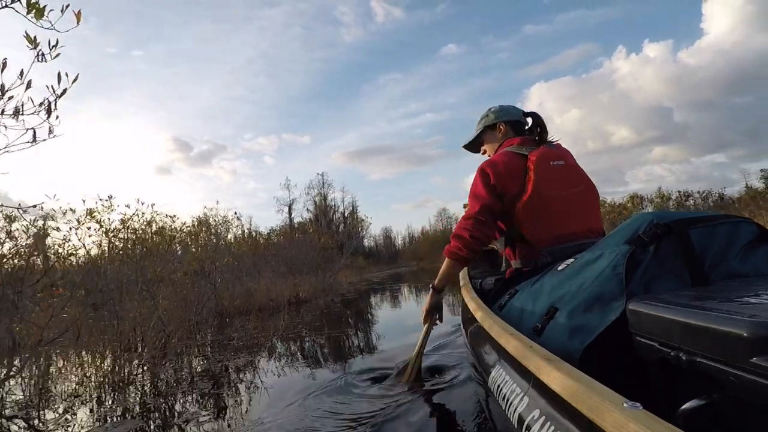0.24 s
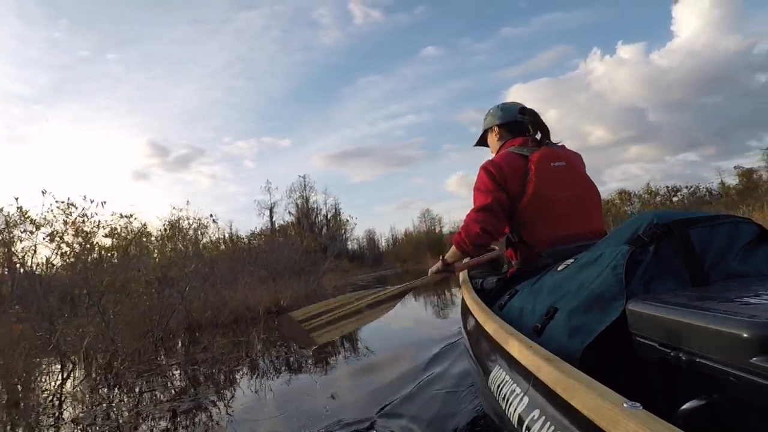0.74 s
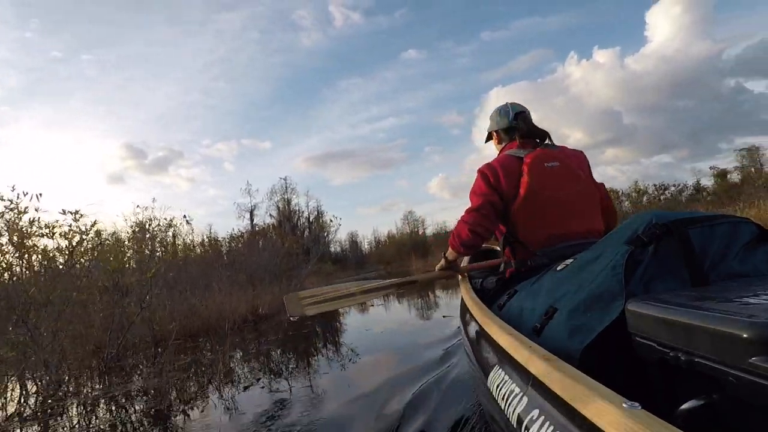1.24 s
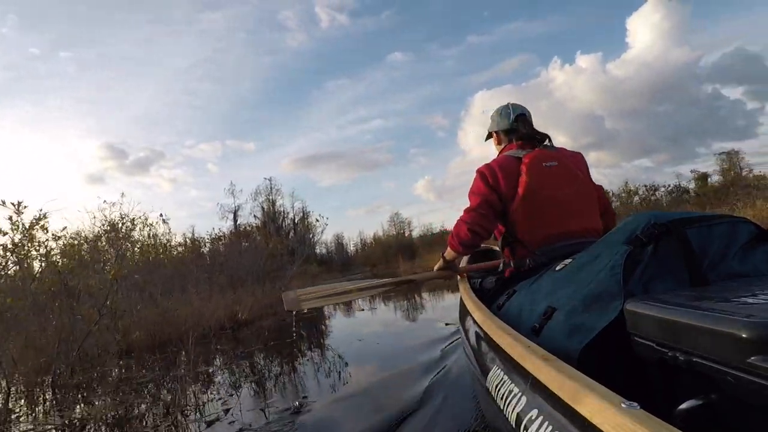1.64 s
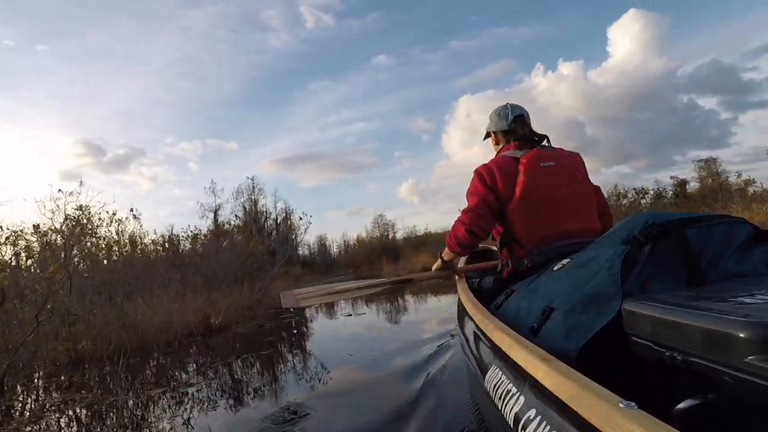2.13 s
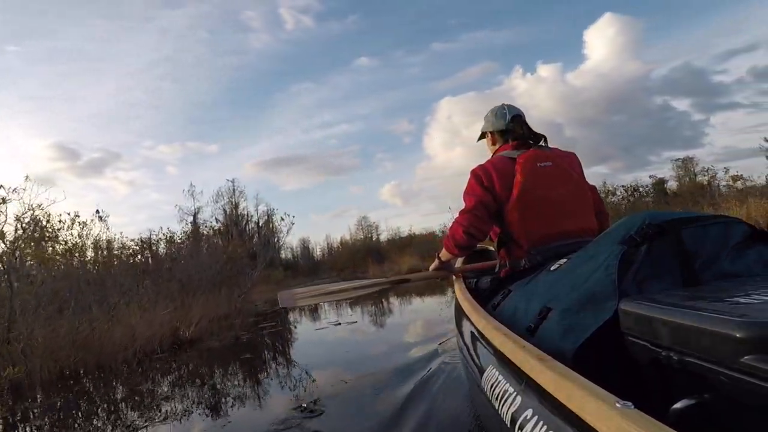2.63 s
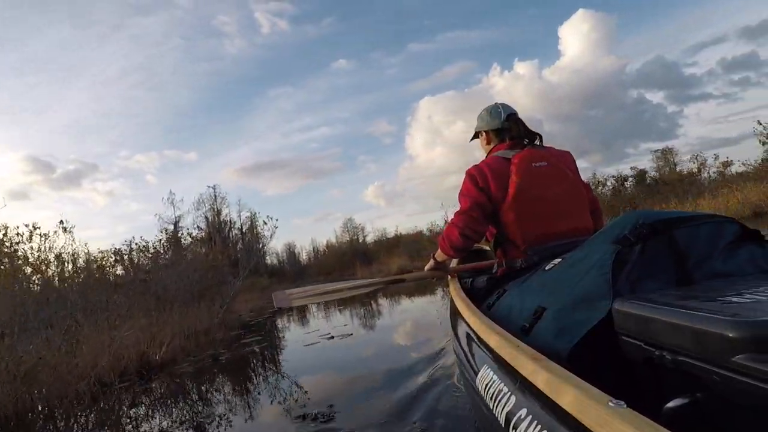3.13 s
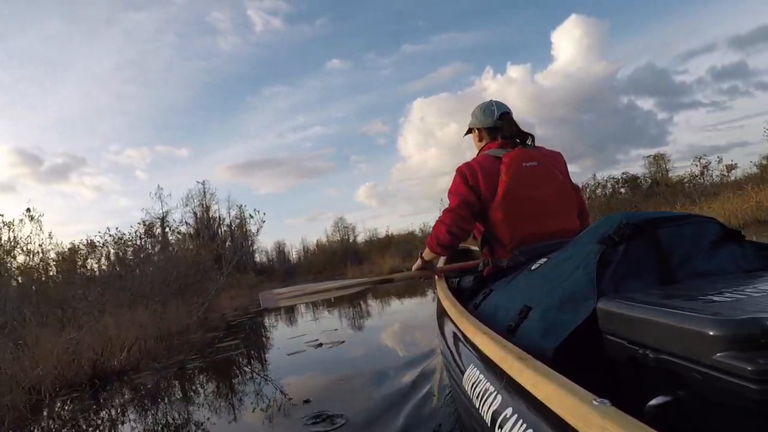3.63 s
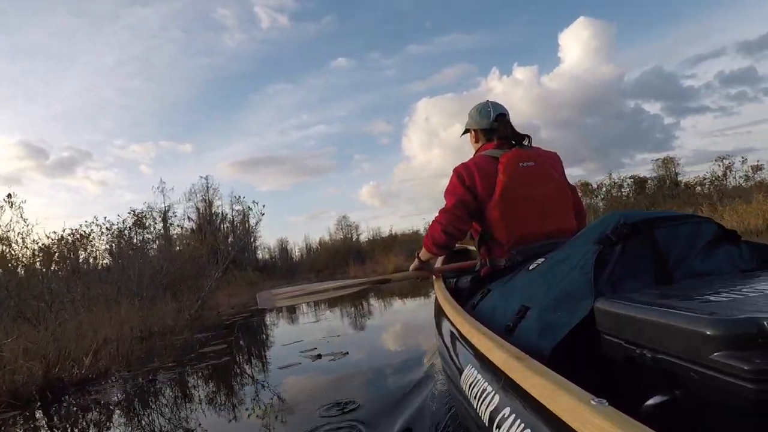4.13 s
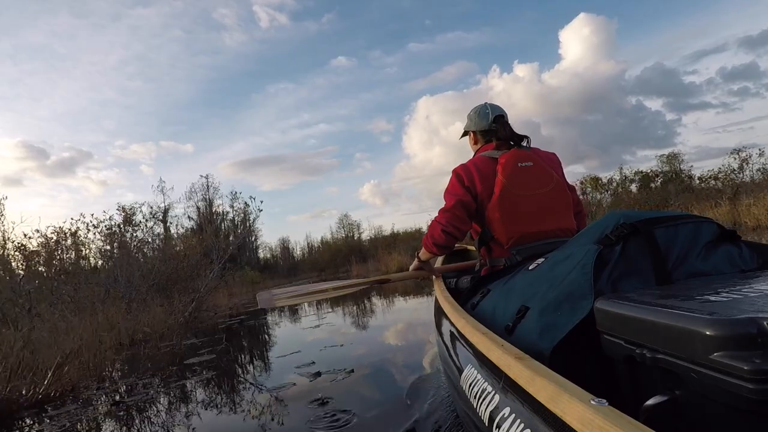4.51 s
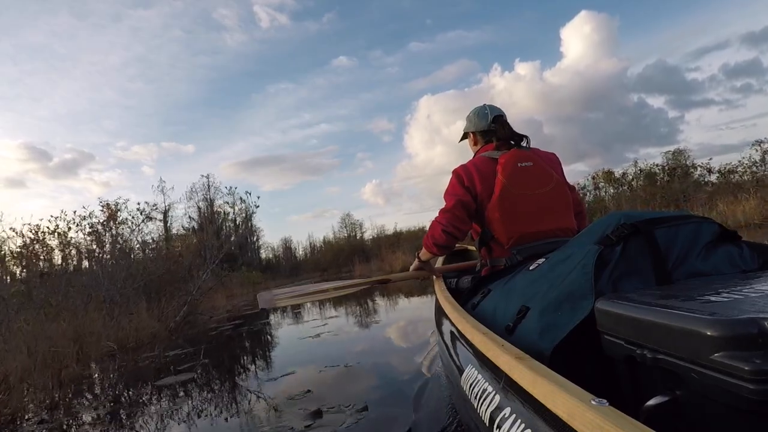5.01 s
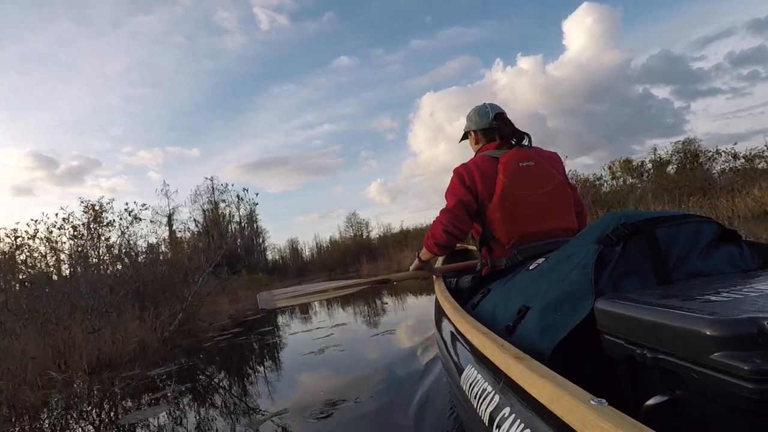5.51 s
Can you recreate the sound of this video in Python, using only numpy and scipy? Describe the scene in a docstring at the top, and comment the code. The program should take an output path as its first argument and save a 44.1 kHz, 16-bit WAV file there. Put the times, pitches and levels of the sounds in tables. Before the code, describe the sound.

A canoe paddle splashes and drips, then knocks against the hull, while low wind buffets the microphone.

```python
"""Wind buffets each microphone and water runs off a lifted paddle as a canoe glides over a still marsh.
Drops and splashes tick, and the air bubbles they trap ring. The shaft knocks and rubs on the gunwale;
hull and mount resonate and carry this to the two microphones, largely in opposite phase. The hull also
rocks, thumps and hums in its low modes. Spray hisses off the blade and later reeds brush past;
insects and reeds hiss far off, and a limiter holds the loudest knocks."""
import sys
import numpy as np
from scipy import signal
from scipy.fft import rfft, irfft
from scipy.io import wavfile
from scipy.ndimage import uniform_filter1d

SR = 44100
rng = np.random.default_rng(int(sys.argv[2]) if len(sys.argv) > 2 else 0)


def transcribe(u):
    """Save the signal u as a 16-bit wav file named by the first command-line argument.

    u: samples, shape (n,) or (channels, n), limited to [-1, 1]; the rate is SR.
    q: integer samples, one column per channel.
    """
    v = np.clip(np.atleast_2d(u).T, -1, 1)
    q = np.round(v * 32767).astype(np.int16)
    wavfile.write(sys.argv[1], SR, q)


N = 254016

# Water running off the blade or lapping at the hull: start_s, hold_s, level_db, tilt_db_per_octave
FLOWS = [(0, 0.013, -46.5, -0.5), (0.212, 0.2, -46, 2.3), (0.635, 0.53, -48, -1.7),
         (3.27, 0.78, -52.5, -3.5), (5.184, 0.17, -51, 2.9), (5.648, 0.028, -44, -2)]
FLOW_RISE_DB_PER_S, FLOW_FALL_DB_PER_S = 171, 114
OPPOSITE = np.array([[1], [-1]])   # sign of the left and right channel


def from_db(db):
    """Amplitude ratio of a level in decibels."""
    return 10 ** (np.asarray(db) / 20)


def rms_one(x):
    """Normalisation to unit rms."""
    return x / np.sqrt(np.mean(x ** 2) + 1e-20)


def at_hz(points, hz):
    """Interpolation on a logarithmic frequency axis."""
    points_hz, values = np.transpose(points)
    return np.interp(np.log(hz), np.log(points_hz), values)


def add(track, start_s, piece):
    """Superposition of a piece on a track."""
    i = int(start_s * SR)
    track[max(i, 0):i + len(piece)] += piece[max(-i, 0):N - i]


def band(x, low_hz, high_hz):
    """Butterworth band-pass."""
    sos = signal.butter(2, [low_hz, min(high_hz, .45 * SR)], "band", fs=SR, output="sos")
    return signal.sosfilt(sos, x)


def low_pass(x, hz, order=4):
    """Butterworth low-pass."""
    return signal.sosfilt(signal.butter(order, hz, fs=SR, output="sos"), x)


def resonate(x, hz, width_hz):
    """A damped resonator, scaled to preserve the rms of white noise."""
    r = np.exp(-np.pi * width_hz / SR)
    gain = np.sqrt((1 - r * r) / 2)
    return signal.lfilter([gain, 0, -gain], [1, -2 * r * np.cos(2 * np.pi * hz / SR), r * r], x)


def drift(corner_hz):
    """Slow random fluctuation: low-passed Gaussian noise of unit rms."""
    step, settle = 40, 2000   # audio samples per point; points discarded
    r = np.exp(-2 * np.pi * corner_hz * step / SR)
    slow = signal.lfilter([1], [1, -2 * r, r * r], rng.standard_normal(N // step + settle + 2))[settle:]
    return np.interp(np.arange(N) / step, np.arange(len(slow)), rms_one(slow))


def grains(per_s, spread_db):
    """A Poisson train of clicks of uneven size, at unit rms."""
    sizes = from_db(spread_db * np.minimum(rng.exponential(1, N), 4)) * rng.choice([-1, 1], N)
    return rms_one(sizes * (rng.random(N) < per_s / SR)) + 1e-18


def pulse(hz, cycles):
    """A pressure pulse: a cosine under a Gaussian envelope, centred 0.05 s in."""
    t = np.arange(-SR // 20, SR // 20) / SR
    return np.cos(2 * np.pi * hz * t) * np.exp(-(t * hz / cycles) ** 2)


def spells(rows, rise_db_per_s, fall_db_per_s, rest_db):
    """Level in dB of spells that rise, hold and decay; their powers add to a resting level."""
    t = np.arange(N) / SR
    power = from_db(2 * rest_db)
    for start_s, hold_s, db, *_ in rows:
        before_db = rise_db_per_s * np.maximum(start_s - t, 0)
        after_db = fall_db_per_s * np.maximum(t - start_s - hold_s, 0)
        power = power + from_db(2 * (db - before_db - after_db))
    return 10 * np.log10(power)


def wind():
    """Turbulent pressure rumbles and eddies pop, independently at each microphone."""
    # Gust strength: time_s, level_db, left_over_right_db
    gusts = [(0, -18, -7.5), (.16, -22, 10.5), (.48, -22.5, -15), (.64, -32.5, 0), (.9, -23, -4.5),
             (1.25, -35.5, -11), (1.44, -24, -17), (1.85, -22.5, 4.5), (1.97, -29, -2), (2.06, -15, 4.5),
             (2.35, -35, -24), (2.55, -31.5, -7), (3.3, -22.5, -6), (3.6, -29.5, 0), (4.1, -29.5, -9.5),
             (4.22, -34, -1.5), (4.42, -34, -6), (4.52, -23.5, 3), (4.75, -28, -0.5), (5.0, -23.5, -9),
             (5.44, -26, -9.5), (5.76, -23, -10)]
    # Spectrum of the turbulence: frequency_hz, density_db
    gust_spectrum = [(20, 0), (50, 3), (90, -2), (150, -17), (300, -24), (600, -59), (1200, -100)]
    # Strong eddies striking one microphone: time_s, peak_db, pulse_hz, microphone (0 left, 1 right)
    eddies = [(0.127, -5, 171, 1), (1.493, -6, 141, 1), (1.629, -16, 136, 1), (2.076, -9.5, 78.4, 1),
              (2.194, -9.5, 105, 1), (2.378, -11, 120, 1), (4.078, -16.5, 120, 1), (4.521, -12, 138, 0),
              (4.709, -14.5, 137, 0), (4.866, -10.5, 126, 1), (5.068, -6.5, 160, 1), (5.127, -6, 170, 1),
              (5.315, -9.5, 160, 1), (5.38, -8, 171, 1), (5.398, -7, 95, 1), (5.502, -11.5, 156, 1),
              (5.603, -9, 167, 1)]
    times_s, *curves = np.transpose(gusts)
    level_db, lean_db = [np.interp(np.arange(N) / SR, times_s, curve) for curve in curves]
    hz = np.maximum(np.fft.rfftfreq(N, 1 / SR), 1)
    rumble = irfft(rfft(rng.standard_normal((2, N))) * from_db(at_hz(gust_spectrum, hz)), N)
    lumps = from_db(3.5 * np.tanh([drift(9), drift(9)]))
    kicks = lumps * np.abs([grains(70, spread_db=1.5), grains(70, spread_db=2.5)])
    pops = signal.fftconvolve(kicks, [pulse(96.4, cycles=.26)], "same")
    choppy_db = spells([(4.78, .9, -1.6)], rise_db_per_s=28, fall_db_per_s=28, rest_db=-8)
    out = rms_one(rumble * lumps) + from_db(choppy_db) * rms_one(pops)
    out *= from_db(level_db + lean_db / 2 * OPPOSITE)
    for time_s, peak_db, pulse_hz, microphone in eddies:
        add(out[round(microphone)], time_s - .05, from_db(peak_db) * pulse(pulse_hz, cycles=.48))
    return out


def marsh():
    """Distant reeds and insects sum to partly coherent broadband hiss and a narrow-band chorus."""
    # Spectrum of the hiss: frequency_hz, relative_density_db
    hiss_spectrum = [(400, -4), (700, -5.5), (1400, -11.5), (2500, -16), (4500, -16.5), (5200, -23.5),
                     (7000, -14.5), (9000, -19.5), (12000, -25), (14500, -32)]
    # Likeness of the hiss at the two microphones: frequency_hz, correlation
    correlations = [(400, -0.73), (1400, -0.83), (3000, 0.2), (6500, 0.85), (10000, -0.12)]
    hiss_db, insects_db = -57, -66.5
    edges_hz = 350 * 2 ** np.arange(0, 6, .5)
    hiss, white = 0, rng.standard_normal((2, 2, N))
    for k, (low_hz, high_hz) in enumerate(zip(edges_hz, edges_hz[1:])):
        centre_hz = np.sqrt(low_hz * high_hz)
        mid, side = band(white[k % 2], low_hz, high_hz)
        alike = np.clip(at_hz(correlations, centre_hz), -.99, .99)
        gain = from_db(at_hz(hiss_spectrum, centre_hz) + 2 * drift(18))
        hiss = hiss + gain * (mid + np.sqrt((1 - alike) / (1 + alike)) * side * OPPOSITE)
    mid, side = resonate(rng.standard_normal((2, N)), hz=5716, width_hz=150)
    insects = mid + .56 * side * OPPOSITE
    return from_db(hiss_db) * hiss / np.std(hiss.mean(axis=0)) + from_db(insects_db) * insects


def flow_tilt():
    """Spectral slope of the running water through time, in dB per octave."""
    start_s, hold_s, _, tilt = np.transpose(FLOWS)
    return np.interp(np.arange(N) / SR, start_s + hold_s / 2, tilt)


def trickle(level_db):
    """Many small bubbles resonate in running water; neighbours in pitch swell in the same clumps."""
    sizes = 20
    size_of_click = rng.integers(0, sizes, N)
    clicks = grains(4500, spread_db=4.5)
    clumps_db = 9 * np.tanh([drift(5.3) / 2, drift(19) / 2, drift(24) / 2])
    rings, tilt = 0, flow_tilt()
    for k, hz in enumerate(np.geomspace(480, 3800, sizes)):
        ring = resonate(clicks * (size_of_click == k), hz, hz / 6)
        rounded = rms_one(resonate(ring, hz, hz / 8))   # a second pass softens the attack
        rings = rings + rounded * from_db(clumps_db[3 * k // sizes] + tilt * np.log2(hz / 1400))
    return from_db(level_db) * rms_one(low_pass(rings, 2700, order=2))


def bubble(hz, rise, noise):
    """Trapped air rings as a damped oscillator of rising pitch; the moving surface makes it flutter."""
    cycles = hz * np.arange(len(noise)) / SR
    swell_cycles, decay_cycles = .62, 8.14 * max(1000 / hz, 1) ** .23
    envelope = np.exp(-cycles / decay_cycles) * (1 - np.exp(-cycles / swell_cycles))
    flutter = 1 + .6 * rms_one(low_pass(noise[::-1], hz / 4))
    return np.sin(2 * np.pi * cycles * (1 + rise * cycles)) * envelope * flutter


def gurgle(flow_db, count=480):
    """Loose bubbles break out of the flow, each with a dull slap and a resonance, from its own side."""
    out, tilt, t = np.zeros((2, N)), flow_tilt(), np.arange(1500) / SR
    draws, noises = rng.random((count, 5)), rng.standard_normal((count, 1500))
    for (when, pitch, strength, rise, side), noise in zip(draws, noises):
        i, hz = int(when * N), 600 * 5 ** pitch
        db = flow_db[i] + 1.5 - 3.5 * np.log(1.05 - strength) + tilt[i] * np.log2(hz / 1400)
        slap = low_pass(band(noise, hz, 2 * hz) * np.exp(-t / .004), min(2 * hz, 3500))
        plop = bubble(hz, .008 * rise ** 2, noise) + 3 * slap
        for channel, share in zip(out, (side, 1 - side)):
            add(channel, i / SR, from_db(db) * 2 * share * plop)
    return out


def overboard(x):
    """Sound from the water reaches the right microphone first and interferes with its echo off the hull."""
    echo = np.roll(x, 130)
    left = from_db(-3.5) * np.roll(x, 2) + .32 * echo
    right = from_db(1.5) * x - .27 * echo
    return np.array([left, right])


def hull(force, modes):
    """Modal superposition: each mode of hull and mount moves the microphones oppositely and together."""
    out = 0
    for k, (hz, width_hz, opposite_db, in_phase_db) in enumerate(modes):
        coupling = from_db(opposite_db) * OPPOSITE + from_db(in_phase_db)
        out = out + (-1) ** k * resonate(force, hz, width_hz) * coupling
    return out


def shaft():
    """Stick-slip friction and knocks drive the hull; each knock has its own share of bright upper ring."""
    # Shaft and water dragging along the hull: start_s, hold_s, level_db
    drags = [(0, 0.014, -21.5), (.25, 0.12, -26.5), (.68, 0.56, -30.5), (1.36, 0.059, -24.5),
             (1.76, 0.0063, -18.5), (2.58, 0.011, -32), (2.84, 0.38, -29), (3.4, 0.16, -26.5),
             (3.74, 0.071, -33), (5.29, 1, -33)]
    # Blows of the shaft on the gunwale: time_s, level_db, upper_mode_trim_db
    knocks = [(0.025, -35, -46), (0.134, -29.5, -22.5), (0.723, -35, -7.5), (0.738, -20.5, -29),
              (0.755, -24, -41), (0.992, -29.5, -43), (1.228, -33.5, -48), (1.262, -35, -41),
              (1.352, -34, -34), (1.37, -24, -39), (1.389, -26, -46), (1.43, -41, -22), (1.718, -32.5, -21),
              (1.784, -41, -18), (2.227, -29, -25), (2.255, -39.5, -12.5), (2.706, -36, -17.5),
              (2.772, -38, -45), (2.809, -33, -45), (2.864, -21.5, -52), (2.881, -9.5, -54.5),
              (2.897, -12, -47), (3.013, -31, -17.5), (3.032, -18.5, -54), (3.055, -25.5, -26),
              (3.073, -31, -24.5), (3.098, -20.5, -26.5), (3.116, -24.5, -35), (3.497, -34.5, -43),
              (3.53, -39, -31), (3.598, -32, -32), (4.001, -34, -34), (5.285, -36, -42)]
    # Middle and upper modes of hull and mount: frequency_hz, width_hz, opposite_phase_db, in_phase_db
    middle_modes = [(531.5, 36, -2, -16), (614.7, 82, 6.5, -16), (488.5, 44, -1.5, -16.5)]
    upper_modes = [(848, 38, -35, 14.5), (1085, 37, 27.5, 9.5), (1170, 330, -19, 11), (1550, 65, 14.5, -21),
                   (2016, 58, 2, 1), (2270, 1500, 0, 9.5)]
    drag_db = spells(drags, rise_db_per_s=119, fall_db_per_s=128, rest_db=-49.5)
    rub = from_db(drag_db + 6 * np.tanh(drift(14))) * grains(1500, spread_db=2)
    middle_force, upper_force = from_db(-11.5) * rub, from_db(-47) * rub
    t = np.arange(1500) / SR
    for time_s, db, upper_trim_db in knocks:
        skid = rms_one(rng.standard_normal(len(t)) * t * np.exp(-t / .0065))
        add(middle_force, time_s - .044, from_db(db - 15) * pulse(588, cycles=1.8))   # soft landing
        add(middle_force, time_s - .002, from_db(db) * skid)
        add(upper_force, time_s - .003, from_db(db + upper_trim_db - 9) * skid)
    middle = hull(low_pass(middle_force, 930), middle_modes)
    return middle + hull(low_pass(upper_force, 2380), upper_modes)


def drops_and_knocks():
    """A drop ticks and its trapped bubble resonates; a few hull knocks have the same tick and ring."""
    # Drops striking the water, and a few short ringing knocks on the hull:
    # time_s, level_db, pitch_hz, tick_trim_db
    impacts = [(0.1037, -27, 730, -15), (0.1371, -20, 693, -16), (0.2073, -30, 1027, -6),
               (0.2842, -33, 1040, -13), (0.3446, -30, 973, -3), (0.3566, -40, 1010, -4),
               (0.4087, -32.5, 800, -10), (0.5764, -37.5, 1170, -1), (0.634, -31.5, 722, -17),
               (0.6534, -31.5, 760, -12), (0.7916, -27, 1356, 0), (0.8609, -31, 1170, -5),
               (0.8854, -23.5, 1240, -8), (1.0076, -34, 1500, -27), (1.0605, -20, 1234, -27),
               (1.1436, -32.5, 1595, -27), (1.7729, -34, 870, 0.5), (2.8365, -34.5, 1540, -2),
               (3.265, -28.5, 956, -36), (3.2884, -36, 930, -39), (3.9464, -38, 1550, -10),
               (5.224, -35.5, 1680, -23), (5.4044, -30.5, 740, -31), (5.5119, -28.5, 772, -7),
               (5.5727, -33, 1550, -23), (0.3112, -40, 2280, -31), (0.5048, -40, 2270, -6.5),
               (0.831, -45, 2800, -14), (0.9235, -29, 6000, -26), (1.5728, -38.5, 3050, -3),
               (3.0599, -27, 2270, -12), (3.4032, -20, 5870, -17), (3.4655, -37.5, 3120, -4),
               (3.684, -22.5, 6900, -40), (3.7155, -30, 9650, -12), (3.7269, -29.5, 6200, -22),
               (4.6304, -33, 6400, -23), (4.7491, -39, 5860, -19), (5.2644, -35.5, 2180, -20),
               (5.3368, -33, 2220, -10), (5.6166, -37, 2200, -18), (0.008, -32, 2010, -28),
               (1.351, -32.5, 1112, -34), (1.362, -25.5, 822, -32), (0.872, -30.5, 928, -10),
               (5.742, -35.5, 751, -25), (3.753, -36, 960, -43), (0.262, -32.5, 697, -12),
               (0.429, -39, 745, -15), (0.457, -43, 1850, 4), (0.8313, -43, 1080, -8),
               (0.119, -23, 730, -5), (0.136, -23, 1826, -30), (0.266, -37.5, 3350, -25),
               (0.287, -42, 2320, -12), (0.581, -37, 517, -37), (0.834, -30, 4640, -30),
               (0.876, -34, 4670, -20), (1.061, -26, 3590, -18), (1.089, -35, 6340, -27),
               (1.126, -35, 4700, -21), (2.42, -40, 1096, -43), (4.278, -34, 12000, -8),
               (4.309, -35, 7250, -25), (3.594, -36.5, 880, -19), (4.05, -43, 1204, -25),
               (2.88, -24, 842, -31), (5.647, -36, 1930, -25), (5.656, -33.5, 850, -18),
               (5.682, -34, 3300, -23)]
    out, t = np.zeros(N), np.arange(3000) / SR
    for time_s, db, hz, tick_trim_db in impacts:
        noise = rng.standard_normal(len(t))
        top_hz = np.clip(3 * hz, 3200, 14500)   # a higher ring has a brighter tick
        burst = low_pass(band(noise, min(hz, top_hz / 2), top_hz), 1.2 * top_hz)
        tick = from_db(tick_trim_db + 7) * burst * np.exp(-t / .002)
        add(out, time_s, from_db(db) * (bubble(hz, .0017, noise) + tick))
    return out


def splashes():
    """The impact of a sheet of water radiates a short burst of broadband noise."""
    # Sheets of water slapping back: time_s, level_db, length_s, top_hz
    sheets = [(0.21, -33.5, 0.0049, 7700), (0.232, -38, 0.0091, 4300), (0.646, -39, 0.036, 2900),
              (0.719, -28.5, 0.02, 6600), (0.792, -33, 0.0043, 6840), (0.863, -31, 0.0038, 6460),
              (0.977, -38.5, 0.0045, 5770)]
    out, t = np.zeros(N), np.arange(3000) / SR
    for time_s, db, length_s, top_hz in sheets:
        burst = rms_one(low_pass(band(rng.standard_normal(len(t)), 1200, top_hz), 1.2 * top_hz))
        envelope = np.exp(-(t / length_s) ** 4) * (1 - np.exp(-t / .0015))
        add(out, time_s, from_db(db) * burst * envelope)
    return out


def boom():
    """Paddle pressure and ripples force the hull's low modes; a thump excites those near its frequency."""
    # Spells of rocking: start_s, hold_s, force_db
    rocks = [(.1, 0.12, -32), (.95, 0.13, -34), (1.2, 0.23, -28.5), (1.72, 0.028, -40), (2.1, 0.14, -38),
             (2.7, 0.1, -31.5), (2.92, 0.18, -30.5), (4.5, 0.069, -36), (4.95, 0.65, -38.5)]
    # Deep thumps on the hull: time_s, force_db, pulse_hz
    thumps = [(0.779, -37, 52.4), (1.12, -38.5, 54), (2.764, -34, 280), (2.906, -18, 255),
              (3.05, -32.5, 211)]
    # Low modes of hull and mount: frequency_hz, width_hz, opposite_phase_db, in_phase_db
    low_modes = [(54, 14, 9, -8), (160.3, 12.8, 4, -6.5), (175, 85, 14, -36), (199, 74, 11.5, -12.5),
                 (263, 12, -64, -10), (392, 120, -24, -8)]
    rock_db = spells(rocks, rise_db_per_s=167, fall_db_per_s=78, rest_db=-48)
    force = from_db(rock_db + 6 * np.tanh(drift(22))) * low_pass(rng.standard_normal(N), 319.5)
    for time_s, db, pulse_hz in thumps:
        add(force, time_s - .05, from_db(db) * pulse(pulse_hz, cycles=1.3))
    return hull(force, low_modes)


def spray_and_reeds():
    """Dense fine clicks merge into band-limited shot noise, heard as a bright hiss."""
    # Spray off the blade first, later reeds brushing past: start_s, hold_s, level_db
    hisses = [(.62, 0.095, -59), (3.39, 0.028, -54.5), (4.1, 0.18, -55.5), (4.61, 0.3, -56.5),
              (5.5, 0.71, -57)]
    level_db = spells(hisses, rise_db_per_s=94, fall_db_per_s=97, rest_db=-66)
    clicks = band(grains(5000, spread_db=6.5), 4100, 14700)
    return from_db(level_db) * rms_one(band(clicks, 5630, 7750))


def spatter():
    """Fine spray off the blade excites brief high resonances, each pitch from its own side."""
    out, sizes = 0, 12
    clicks = grains(400, spread_db=3)
    size_of_click = rng.integers(0, sizes, N)
    for k, hz in enumerate(np.geomspace(2800, 7800, sizes)):
        pan = from_db(rng.normal(0, 3) * OPPOSITE)
        out = out + resonate(clicks * (size_of_click == k), hz, hz / 7) * pan
    level_db = spells([(.7, .37, -62)], FLOW_RISE_DB_PER_S, FLOW_FALL_DB_PER_S, rest_db=-73.5)
    return from_db(level_db) * rms_one(out)


def groan():
    """The leaning paddle forces the hull into a wavering vibration, in phase at both microphones."""
    # Hums of the hull: start_s, hold_s, level_db, pitch_hz
    hums = [(1.109, 0.018, -28.5, 160), (1.223, 0.17, -28.5, 159.8), (1.61, 0.016, -31, 169),
            (2.93, 0.079, -29, 263)]
    out, waver_hz, swell_db = 0, 6.07 * drift(12.2), -drift(14)
    for start_s, hold_s, db, hz in hums:
        level_db = spells([(start_s, hold_s, db)], rise_db_per_s=269, fall_db_per_s=148, rest_db=-120)
        tone = np.sqrt(2) * np.sin(2 * np.pi * np.cumsum(hz + waver_hz) / SR)
        out = out + from_db(level_db + swell_db) * tone
    return out


def scene():
    """Airborne sound of water and marsh, structure-borne sound of the paddle and wind noise superpose."""
    flow_db = spells(FLOWS, FLOW_RISE_DB_PER_S, FLOW_FALL_DB_PER_S, rest_db=-67)
    alongside = overboard(drops_and_knocks() + splashes() + trickle(flow_db) + spray_and_reeds())
    return alongside + gurgle(flow_db) + spatter() + shaft() + boom() + groan() + wind() + marsh()


def record(dry):
    """The microphones pass no static pressure; a limiter ducks under loud peaks; the top is cut."""
    low_cut_hz, high_cut_hz = 18, 14800
    limit_db, release_db_per_s = -2.5, 250
    heard = signal.lfilter(*signal.butter(1, low_cut_hz, "high", fs=SR), dry - dry[:, :1])
    over_db = np.maximum(20 * np.log10(np.abs(heard).max(axis=0) + 1e-9) - limit_db, 0)
    release_db = release_db_per_s * np.arange(N) / SR
    held_db = np.maximum.accumulate(over_db + release_db) - release_db
    duck_db = uniform_filter1d(held_db, size=100, origin=-49)   # looks about 2 ms ahead
    high_cut = signal.cheby2(12, 70, high_cut_hz, fs=SR, output="sos")
    return signal.sosfilt(high_cut, heard * from_db(-duck_db))


dry = scene()
out = record(dry)
transcribe(out)
```